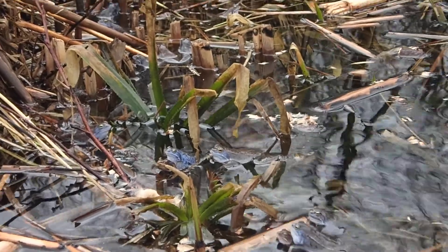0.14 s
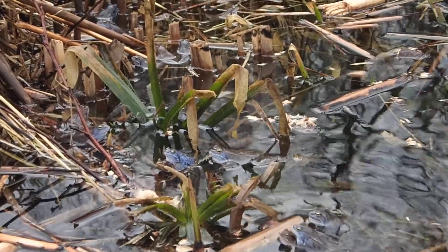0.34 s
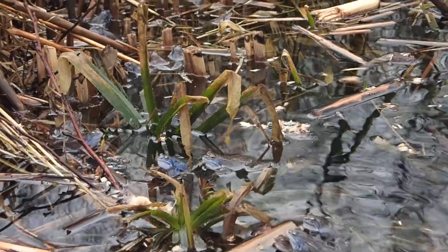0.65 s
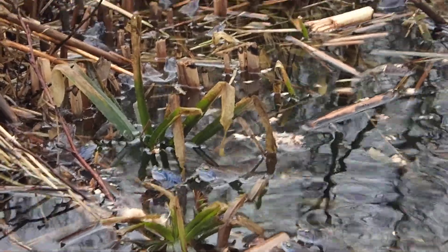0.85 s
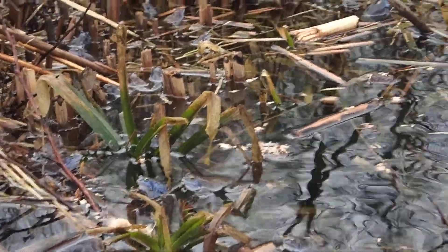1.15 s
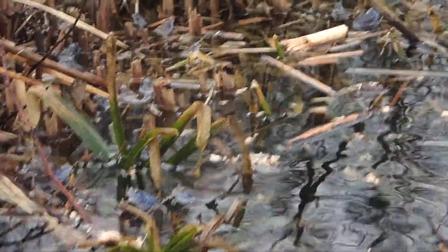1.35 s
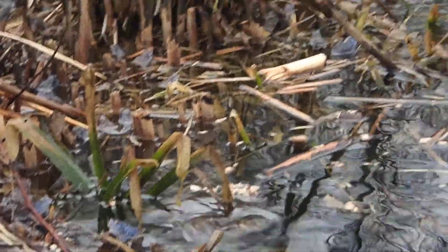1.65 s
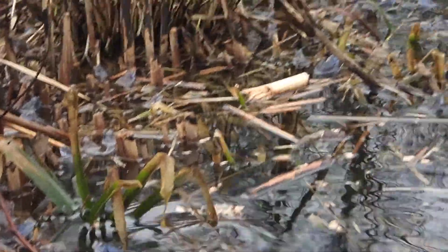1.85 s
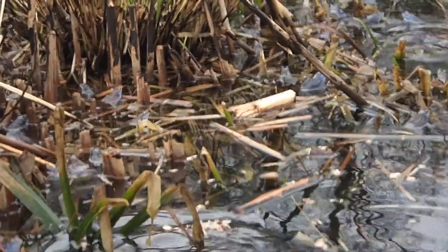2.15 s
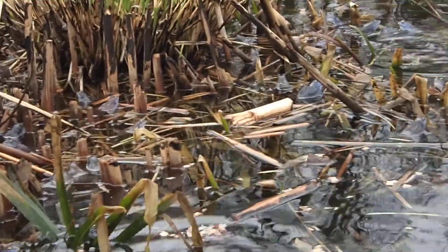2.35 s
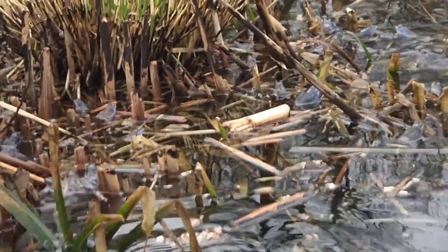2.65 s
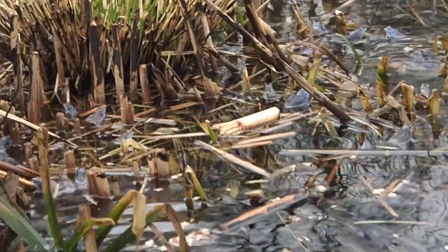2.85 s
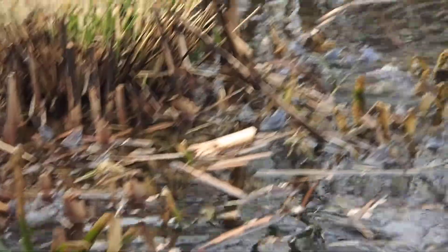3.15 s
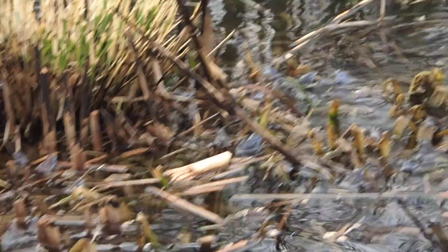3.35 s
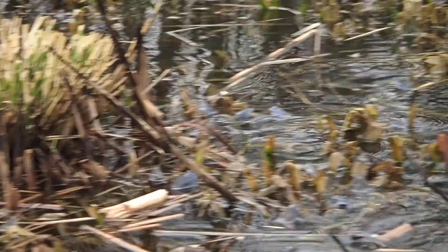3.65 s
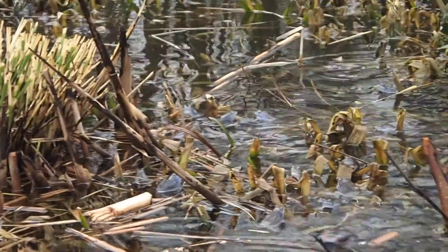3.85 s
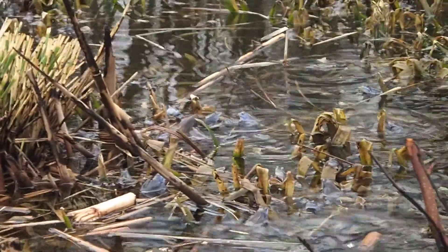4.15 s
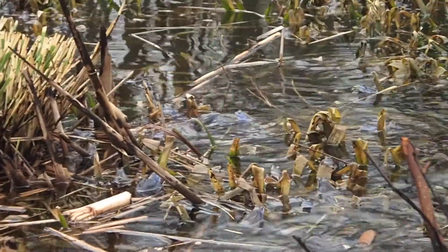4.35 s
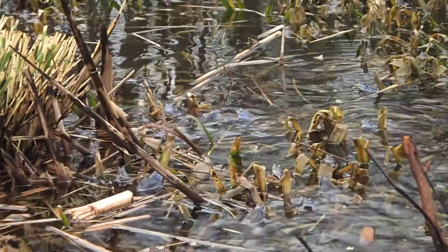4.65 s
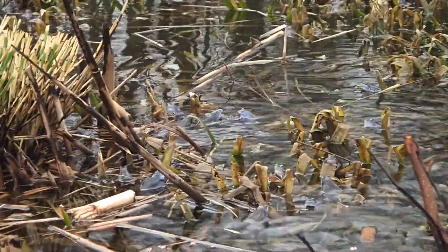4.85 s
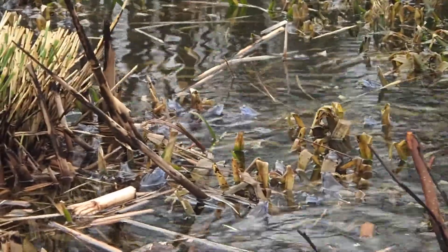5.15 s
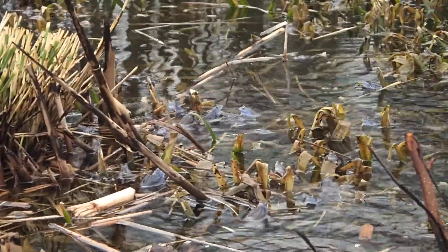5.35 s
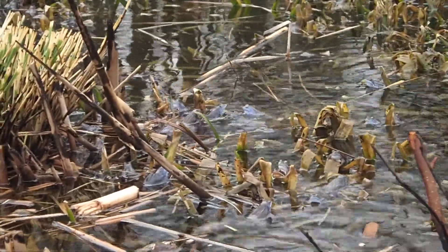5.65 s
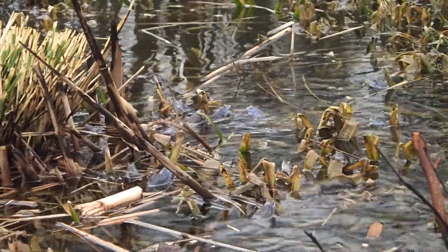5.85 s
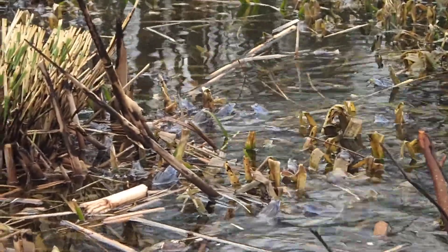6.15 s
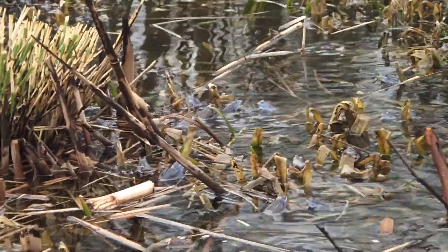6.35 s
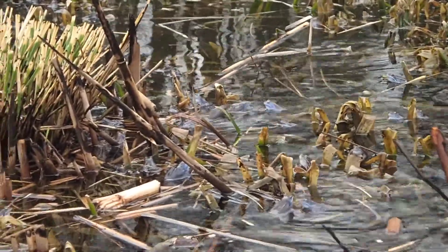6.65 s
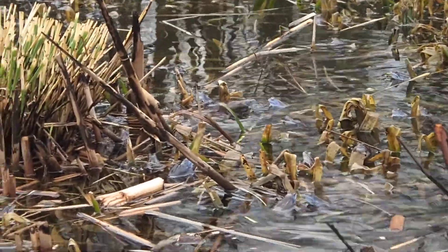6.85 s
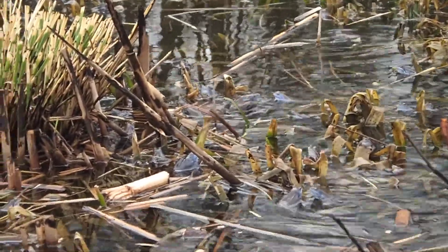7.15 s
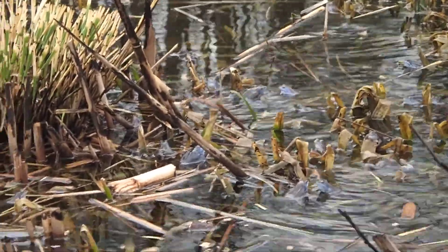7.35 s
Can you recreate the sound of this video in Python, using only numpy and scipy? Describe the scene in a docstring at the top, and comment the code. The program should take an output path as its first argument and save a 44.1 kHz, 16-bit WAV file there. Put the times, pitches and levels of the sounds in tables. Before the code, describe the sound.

Continuous gurgling frog chorus, short mellow hoots sliding upward and overlapping with a gravelly distant crowd. Thin whistled bird chirps strengthen after the first second and stop past the middle, leaving faint distant echoed ones. The handheld camera's microphone picks up crisp ticking and a short rubbing noise from its own body. Quiet open air, soft rumble, a barely audible distant motor hum and light hiss.

```python
"""Frogs call in a dense chorus on a reedy pond: short rising harmonic whoops, a few close and a crowd further out.
A small bird whistles gliding chirps to the right, echoing off the bank; a second one far off is heard as echo.
A handheld camera ticks (decaying body modes) and is brushed by a hand (coloured noise); its microphones hiss.
Low outdoor rumble is filtered noise, and a distant motor hums as a wandering sine."""
import sys
import numpy as np
from scipy import signal
from scipy.fft import rfft, irfft
from scipy.io import wavfile
from scipy.ndimage import uniform_filter1d

SR = 44100
rng = np.random.default_rng(int(sys.argv[2]) if len(sys.argv) > 2 else 0)


def master(y):
    """Save y as 16-bit WAV."""
    cut = np.clip(np.atleast_2d(y).T, -1, 1)
    pcm = np.round(cut * 32767)  # scale
    wavfile.write(sys.argv[1], SR, pcm.astype(np.int16))


N = 330746


def undb(db):
    """Decibels to amplitude gain."""
    return 10 ** (np.asarray(db) / 20)


def level(x, rms_db):
    """Scale to an rms level."""
    return x * undb(rms_db) / np.sqrt(np.mean(x ** 2))


def curve(rows):
    """Join (time_s, value) rows by straight lines."""
    return np.interp(np.arange(N) / SR, *np.transpose(rows))


def colour(x, spectrum):
    """Filter by (freq_hz, gain_db) rows, interpolated over log frequency."""
    freq_hz, gain_db = np.transpose(spectrum)
    size = 2 ** 20
    bins_hz = np.maximum(np.fft.rfftfreq(size, 1 / SR), 1)
    # only 2**19 points are needed for the scene length
    bins_hz = np.maximum(np.fft.rfftfreq(size // 2, 1 / SR), 1)
    gain = undb(np.interp(np.log(bins_hz), np.log(freq_hz), gain_db))
    return irfft(rfft(x, size // 2) * gain)[..., :N]


def pan(right_db):
    """Gains of the two channels, right_db apart."""
    return undb(np.array([[-right_db], [right_db]]) / 2)


def ports(x):
    """Sound reaches the right microphone two samples after the left."""
    return np.array([x, np.roll(x, 2)])


def add(track, start_s, sound):
    """Mix a sound in at a time, trimmed to the track."""
    i = int(start_s * SR)
    a, b = max(i, 0), min(i + len(sound), N)
    if b > a:
        track[a:b] += sound[a - i:b - i]


def wobble(t, rate_hz):
    """Gaussian random values at rate_hz, joined by lines."""
    return np.interp(t * rate_hz, np.arange(64), rng.standard_normal(64))


def echo(x, t60_s, rise_s):
    """Diffuse return: unit-energy noise tail that builds over rise_s and decays by t60_s."""
    t = np.arange(SR) / SR
    decay = np.exp(-np.log(1000) * t / t60_s)
    tail = rng.standard_normal(len(t)) * decay * (1 - np.exp(-t / rise_s))
    return signal.fftconvolve(x, tail / np.linalg.norm(tail))[:N]


def wide_echo(x, t60_s, rise_s):
    """Two independent echoes, one a channel."""
    return np.array([echo(x, t60_s, rise_s) for _ in range(2)])


# outdoor rumble spectrum: freq_hz, density_db [dB per Hz]
RUMBLE_SPECTRUM = [(20, -29), (45, -2.5), (90, 3.5), (180, 2), (210, -3.5), (250, 0), (500, -8),
                   (1000, -4.5), (2000, -32.5), (4000, -31), (9000, -30)]
# microphone hiss spectrum: freq_hz, density_db [dB per Hz]
HISS_SPECTRUM = [(500, -55), (2100, -8), (2640, -19.5), (3190, -7.5), (3950, -49), (4500, -11), (4850, -8),
                 (5300, -2), (6200, -4.5), (6900, -6.5), (7980, -1), (9040, -9), (11500, -10), (16000, -12)]
# distant motor hum: time_s, level_db
HUM_LEVEL = [(0, -62), (5.6, -58.5), (6.4, -53.5), (7.0, -53.5), (7.5, -84)]


def background(rumble_db=-49, apart_db=-6, hiss_db=-54):
    """Rumble noise mostly shared by the channels, a wandering motor hum, independent hiss."""
    air = rng.standard_normal(N) + undb(apart_db) * rng.standard_normal((2, N))
    rumble = level(colour(air, RUMBLE_SPECTRUM), rumble_db)
    hum_hz = 210 * (1 + 0.0136 * wobble(np.arange(N) / SR, 5))
    hum = undb(curve(HUM_LEVEL)) * np.sin(2 * np.pi * np.cumsum(hum_hz) / SR)
    hiss = level(colour(rng.standard_normal((2, N)), HISS_SPECTRUM), hiss_db)
    return (rumble + hum) * pan(right_db=6.0) + hiss * pan(right_db=5.5)


# camera body ticks: start_s, level_db, treble_db [extra on modes above 6 kHz]
BODY_TICKS = [(1.7099, -24.5, -11), (1.791, -32, 3), (1.8073, -28, -9), (1.8212, -31, 3.5),
              (1.8459, -33.5, -1), (1.932, -28.5, 4.5), (1.9637, -32.5, 5), (1.9777, -26.5, -4),
              (2.2518, -31, 6), (2.3699, -26.5, -3), (2.395, -32, 2), (2.4204, -28, -4),
              (2.4445, -29.5, 4.5), (2.5737, -24, -4), (2.6574, -21.5, 4), (2.778, -30.5, 8),
              (2.803, -24.5, -1), (2.946, -23.5, 6), (3.033, -18, 0.5), (3.32, -29, -9), (3.461, -32, 0.5),
              (3.901, -35, -3), (4.0412, -28, 5.5), (7.0728, -43, 5)]
# camera body modes: freq_hz, t60_s, level_db
BODY_MODES = [(160, .035, -36), (1350, .005, -26), (2080, .006, -26.5), (3150, .005, -22.5),
              (5290, .0055, 0.5), (6400, .003, -10.5), (8200, .002, -5), (10000, .0015, -16)]
# transmission through the case: freq_hz, gain_db
CASE_RESPONSE = [(1900, 14.5), (2600, 6.5), (4300, -4), (5100, 5.5), (7000, 11.5)]
BOUNCE_S, BOUNCE_DB = 0.001006, -2  # loose plastic strikes again; nominal delay


def camera_ticks(high_db=4.5, low_db=3, lag_s=0.00008, top_hz=11000):
    """Double strikes ring body modes; the low ones shake both microphones at once."""
    low, high = np.zeros(N), np.zeros(N)
    t = np.arange(int(.03 * SR)) / SR
    freq_hz, t60_s, mode_db = np.transpose(BODY_MODES)[:, :, None]
    deep = freq_hz < 4000
    envelope = np.exp(-np.log(1000) * t / t60_s) * (1 - np.exp(-t / .0001))
    for start_s, tick_db, treble_db in BODY_TICKS:
        bounce_s = BOUNCE_S * rng.uniform(.7, 1.5)
        for later_s, softer_db in [(0, 0), (bounce_s, BOUNCE_DB)]:
            scatter_db = 2 * rng.standard_normal(freq_hz.shape) * deep
            ring_db = tick_db + softer_db + mode_db + treble_db * (freq_hz > 6000) + scatter_db
            detune = 1 + .015 * rng.standard_normal(freq_hz.shape)
            modes = undb(ring_db) * envelope * np.sin(2 * np.pi * freq_hz * detune * t)
            add(low, start_s + lag_s + later_s, (modes * deep).sum(0))
            add(high, start_s + lag_s + later_s, (modes * ~deep).sum(0))
    ticks = undb(low_db) * low * pan(right_db=4) + undb(high_db) * ports(high) * pan(right_db=5.5)
    soft = signal.butter(6, top_hz, fs=SR, output="sos")  # plastic contact has little top
    return colour(signal.sosfilt(soft, ticks), CASE_RESPONSE)


# hand on the camera: time_s, level_db
BRUSH_LEVEL = [(2.95, -68), (3.1, -53.5), (3.42, -65), (3.52, -49.5), (3.58, -45.5), (3.63, -50.5),
               (3.72, -63), (3.9, -60)]
# brushing spectrum: freq_hz, density_db [dB per Hz]
BRUSH_SPECTRUM = [(1500, -23), (4200, -14.5), (5300, 10), (6000, -5.5), (7000, -6), (8200, -9),
                  (11000, -23), (15000, -31)]


def camera_brush():
    """A hand slides over the camera: coloured noise under a slow envelope."""
    times_s, slide_db = np.transpose(BRUSH_LEVEL)
    slide = np.interp(np.arange(N) / SR, times_s, undb(slide_db), left=0, right=0)
    friction = level(colour(rng.standard_normal((2, N)), BRUSH_SPECTRUM), 0)
    return friction * slide * pan(right_db=12.5)


# trailing notes, by chirp name: delay_s, level_db [against the chirp]
TRAILING_NOTES = {"lift": (.094, -14), "drop": (.11, -10)}


def bird_notes(rows):
    """Each chirp, and any softer note that trails it."""
    for start_s, kind, level_db, *trailing in rows:
        yield start_s, kind, level_db
        for note in trailing:
            delay_s, softer_db = TRAILING_NOTES[note]
            yield start_s + delay_s, note, level_db + softer_db


# chirp contours, by name: time_s [into the chirp], pitch_hz, level_db
CHIRP_SHAPES = { "high": [(0, 6750, -22), (.006, 5950, -7), (.013, 5530, 0), (.033, 5350, -1.5),
                (.045, 4250, -16), (.06, 3450, -24)], "lift": [(0, 3700, -14), (.011, 4500, 0),
                (.021, 4550, -1), (.03, 4450, -18)], "middle": [(0, 6500, -10), (.009, 5000, -2),
                (.018, 4680, -4), (.047, 4580, -2), (.058, 3950, -20), (.07, 3400, -24)],
                "drop": [(0, 4790, 0), (.01, 3980, -11), (.026, 3190, -12)], "low": [(0, 7070, -15),
                (.006, 5180, -0.5), (.016, 4050, -17), (.07, 3780, -23)], "slip": [(0, 6130, -4),
                (.015, 5500, 0), (.035, 5000, -5)], "slide": [(0, 4700, 0), (.03, 4150, -3),
                (.085, 3400, -4)]}


def whistle(rows, waver=0.011, flutter_db=3.5):
    """Whistled sine slurs that flutter in pitch and strength."""
    out = np.zeros(N)
    for start_s, kind, level_db in bird_notes(rows):
        times_s, contour_hz, shape_db = np.transpose(CHIRP_SHAPES[kind])
        t = np.arange(int(times_s[-1] * SR)) / SR
        glide_hz = uniform_filter1d(np.interp(t, times_s, contour_hz), size=300)  # syrinx rounds turns
        pitch_hz = glide_hz * (1 + waver * wobble(t, 374))
        fade = np.clip(np.minimum(t, t[-1] - t) / 0.00017, 0, 1)
        gain = undb(level_db + np.interp(t, times_s, shape_db) + flutter_db * wobble(t, 157))
        add(out, start_s, fade * gain * np.sin(2 * np.pi * np.cumsum(pitch_hz) / SR))
    return out


# near bird: start_s, chirp, level_db, trailing_note [optional]
NEAR_BIRD_CALLS = [(.295, "slip", -53), (.402, "slip", -52), (.509, "slip", -52), (.69, "low", -49),
                   (.765, "slide", -64), (1.021, "high", -37.5, "lift"), (1.395, "high", -34.5, "lift"),
                   (1.76, "high", -32.5, "lift"), (2.12, "middle", -42, "drop"),
                   (2.501, "middle", -41.5, "drop"), (2.858, "high", -36.5), (3.194, "low", -39.5),
                   (3.531, "low", -38.5), (3.85, "low", -39), (4.183, "high", -39.5, "lift"),
                   (4.561, "high", -42)]
# second bird far off: start_s, chirp, level_db
FAR_BIRD_CALLS = [(4.6, "high", -38), (4.83, "middle", -46), (6.2, "slide", -56), (6.63, "high", -49)]
BANK_T60_S, BANK_RISE_S = .95, .03
REFLECTION_S, REFLECTION_T60_S = .085, .35


def bird(direct_db=-1, bank_db=-8.0, far_db=-1, reeds_db=-11, return_db=-14):
    """Near bird direct, blurred by reeds, with a delayed smeared return; both birds in the bank echo."""
    near = whistle(NEAR_BIRD_CALLS)
    far = undb(far_db) * whistle(FAR_BIRD_CALLS)
    reeds = wide_echo(near, .07, .002)
    delayed = np.roll(near, int(REFLECTION_S * SR))
    returned = wide_echo(delayed, REFLECTION_T60_S, BANK_RISE_S)
    bank = wide_echo(near + far, BANK_T60_S, BANK_RISE_S)
    around = undb(reeds_db) * reeds + undb(return_db) * returned + undb(bank_db) * bank
    return undb(direct_db) * ports(near) * pan(right_db=11.5) + around * pan(right_db=17.0)


def whoop(length_s, start_hz, end_hz, first_db, second_db, fall_db, jitter, rough, pulsing):
    """One call: quick swell, pitch climbing fast at first; the larynx lets the air out in fine pulses."""
    t = np.arange(int(length_s * SR)) / SR
    u = t / length_s
    climb = u + 0.24 * u * (1 - u)
    pitch_hz = (start_hz + (end_hz - start_hz) * climb) * (1 + jitter * wobble(t, 225.5))
    phase = 2 * np.pi * np.cumsum(pitch_hz) / SR + rng.uniform(0, 2 * np.pi)
    overtones = sum(undb(second_db - fall_db * k) * np.sin((k + 2) * phase) for k in range(3))
    pulse_hz = 135 * np.exp(0.19 * wobble(t, 60.5))
    pulse_phase = 2 * np.pi * (np.cumsum(pulse_hz) / SR + rng.uniform())
    pulses = (1 + pulsing * np.sin(pulse_phase)) * np.exp(rough * wobble(t, 276.5))
    effort = np.sin(np.pi * u ** 0.49)
    brightness = np.sin(np.pi * u) ** .5  # peaks in mid-call
    return effort * pulses * (undb(first_db) * np.sin(phase) + brightness * overtones)


# crowd swelling and thinning: time_s, level_db
CROWD_LEVEL = [(0.0, -39), (1.06, -35.5), (1.43, -36.5), (1.78, -36.5), (2.45, -37.0), (2.78, -39),
               (3.31, -35.5), (4.39, -40), (4.76, -35), (5.1, -40), (5.45, -37), (5.82, -39.5),
               (6.12, -35.5), (6.35, -39), (6.45, -37), (6.86, -41), (6.98, -34), (7.49, -39)]


def far_frogs(count=620, center_hz=535, second_db=-12.5, wet_db=-10):
    """Frogs further out: gravelly calls with scattered pitch, glide, length and level, plus echo."""
    out = np.zeros(N)
    draws = np.clip(rng.standard_normal((count, 6)), -2, 2)
    for k, (when, size, climb, span, far, bright) in enumerate(draws):
        pitch_hz = center_hz * np.exp(.18 * size)
        rise = np.exp(0.2996 * (1 + 0.565 * climb) / 2)  # half the glide, as a ratio
        length_s = 0.0448 * np.exp(0.1764 * span)
        level_db = 0.8 * far
        overtone_db = level_db + second_db + 2.8 * bright
        start_s = (k + when) / count * (N / SR + .06) - .06
        call = whoop(length_s, pitch_hz / rise, pitch_hz * rise, level_db, overtone_db,
                     fall_db=3, jitter=0.016, rough=0.27, pulsing=0.8)
        add(out, start_s, call)
    wet = undb(wet_db) * echo(out, t60_s=0.63, rise_s=0.039)
    return level(out + wet, 0) * undb(curve(CROWD_LEVEL))


# near calls: start_s, start_hz, climb_semitones, length_s, level_db,
# second_db [second harmonic against the first, before bright_db]
NEAR_CALLS = [(0.12, 428, 2.8, 0.045, -32, -17), (0.298, 422, 6.8, 0.039, -35.5, -14),
              (0.363, 558, 5.2, 0.034, -33, -14), (0.377, 359, 12, 0.067, -40, -5),
              (0.512, 430, 5.7, 0.038, -36, -5), (0.635, 613, 3.9, 0.048, -42, -2),
              (0.722, 455, 3.7, 0.093, -38, -5.5), (0.893, 616, 7.4, 0.045, -40.5, -7),
              (1.012, 534, 6.7, 0.058, -33, -13), (1.052, 348, 8.2, 0.072, -38, -6),
              (1.067, 473, 9.2, 0.049, -36.0, -3.5), (1.215, 469, 3.4, 0.065, -47.5, 8),
              (1.266, 428, 12.7, 0.074, -32.5, -7.5), (1.317, 513, 9, 0.053, -36, -2.5),
              (1.353, 408, 3.2, 0.046, -30, -20), (1.517, 450, 8.2, 0.082, -55, -2),
              (1.517, 472, 7.7, 0.047, -33.5, -5), (1.542, 625, 2.3, 0.03, -31.5, -11),
              (1.723, 512, 9, 0.05, -32, -8.5), (1.727, 496, 3.6, 0.064, -34.5, -9),
              (1.8, 518, 4.2, 0.07, -37.5, -11), (1.803, 421.6, 12.4, 0.072, -35.5, -10),
              (1.981, 499, 3, 0.075, -36, -7), (2.021, 556, 1.8, 0.032, -33, -9),
              (2.032, 425, 4.5, 0.022, -27.5, -27), (2.268, 628, 8.3, 0.032, -37.5, -6),
              (2.318, 491, 7, 0.049, -37, -11.5), (2.405, 526, 11, 0.07, -39, -9),
              (2.449, 489, 2.4, 0.032, -29, -9.5), (2.467, 444, 4.9, 0.05, -33, -3.5),
              (2.485, 426.6, 10, 0.082, -43, -9), (2.572, 358, 8, 0.054, -41, -1),
              (2.819, 507, 11.3, 0.054, -42.5, -2), (3.055, 489, 8.6, 0.047, -38, -11),
              (3.2, 466, 9.3, 0.038, -33.5, -21), (3.233, 485, 9.9, 0.041, -37, -11),
              (3.338, 484.5, 8.7, 0.074, -38.5, -11), (3.519, 556, 5.6, 0.079, -38, -8),
              (3.775, 464, 5, 0.035, -39, -15), (3.94, 567, 9.2, 0.031, -36, -20),
              (3.947, 406.5, 14.3, 0.057, -41.5, 2), (3.966, 560, 8.2, 0.028, -34.0, -7),
              (3.995, 342, 9.4, 0.076, -34.5, -14), (4.067, 438, 5.8, 0.073, -37.5, -5.5),
              (4.278, 428, 5, 0.042, -34, -5.5), (4.669, 355.4, 10, 0.092, -48.5, 6),
              (4.709, 629, 4.8, 0.042, -35.5, -14), (4.778, 449, 2.6, 0.064, -37, -16),
              (4.825, 493, 5.1, 0.045, -35, -11.5), (4.902, 441, 6, 0.046, -34.5, -12),
              (5.395, 527.5, 3, 0.064, -31.5, -12), (5.435, 492, 3.4, 0.029, -32.5, -5),
              (5.439, 474, 3.2, 0.045, -33.5, -6), (5.46, 474, 3.1, 0.048, -34.5, -13),
              (5.584, 500, 4.1, 0.044, -31.5, -16), (5.605, 348, 9.2, 0.046, -48, 3),
              (5.613, 495, 1.56, 0.046, -33, -4), (5.825, 402, 4.3, 0.027, -33, -26),
              (5.865, 481, 2.1, 0.028, -31.5, -16), (6.0, 318, 3.5, 0.066, -36.5, -21),
              (6.11, 562, 4.3, 0.023, -30, -17), (6.13, 326, 3, 0.1, -42, -25),
              (6.179, 461, 5.3, 0.098, -33, -18), (6.244, 449, 2.5, 0.057, -35.5, -10.5),
              (6.396, 379, 10.3, 0.053, -40, -1.5), (6.407, 549, 3.1, 0.062, -39.5, -7),
              (6.444, 523, 8.5, 0.043, -30.5, -10), (6.462, 349, 8.2, 0.07, -46.5, -3),
              (6.627, 510, 2.9, 0.047, -34, -13), (6.687, 409, 11.2, 0.059, -42, -0.5),
              (6.897, 471, 3.8, 0.036, -35.5, -13), (6.93, 587, 7, 0.058, -41.5, -3.5),
              (7.039, 419, 14.6, 0.096, -44, -7), (7.049, 447.6, 10.4, 0.079, -36.0, -20),
              (7.104, 508, 3.9, 0.056, -39.5, -7), (7.231, 532, 3.6, 0.038, -33.5, -15),
              (7.343, 624, 7, 0.042, -50, 2), (7.351, 428, 6, 0.04, -42.5, 3.5)]


def near_frogs(bright_db=3.0):
    """Closest callers: clear whoops, each at its own pitch, climb, length and strength."""
    out = np.zeros(N)
    for start_s, start_hz, climb_semitones, length_s, level_db, second_db in NEAR_CALLS:
        end_hz = start_hz * 2 ** (climb_semitones / 12)
        call = whoop(length_s, start_hz, end_hz, level_db, level_db + second_db + bright_db,
                     fall_db=12, jitter=0.012, rough=0.12, pulsing=0.35)
        add(out, start_s, call)
    return out


# tone of the frogs' calls: freq_hz, gain_db
FROG_TONE = [(150, -20.5), (310, -1.5), (400, 0), (480, 4.5), (1100, 2.5), (1650, -2.5), (1880, -12.5),
             (2050, -7), (2600, -14.5), (4000, -39)]


def chorus(near_db=-1, crowd_db=-3, reeds_db=-19):
    """All frogs shaped by a common tone that falls away above about 1.8 kHz, with a faint wide echo from the
    reeds."""
    callers = undb(near_db) * near_frogs() + undb(crowd_db) * far_frogs()
    frogs = colour(callers, FROG_TONE)
    reeds = wide_echo(frogs, t60_s=0.37, rise_s=0.15)
    return (frogs + undb(reeds_db) * reeds) * pan(right_db=6.0)


def scene():
    """The pond as heard from its bank."""
    return background() + camera_ticks() + camera_brush() + bird() + chorus()


def record(dry):
    """Steep low-pass: the recorder cuts the top above 16.25 kHz."""
    return signal.sosfilt(signal.ellip(10, .2, 70, 16250, fs=SR, output="sos"), dry)


dry = scene()
out = record(dry)
master(out)
```